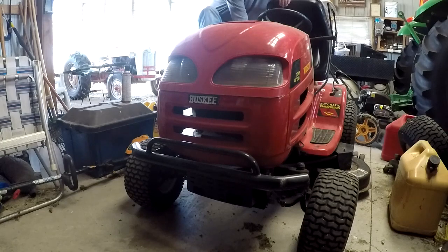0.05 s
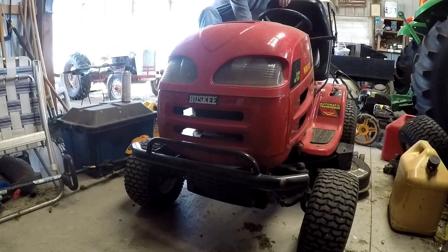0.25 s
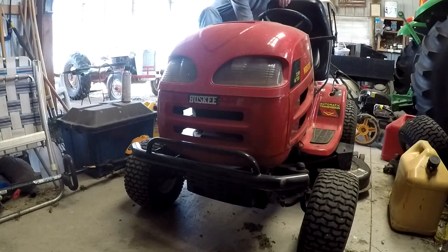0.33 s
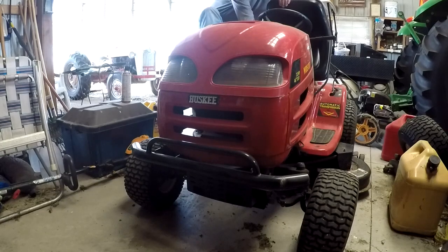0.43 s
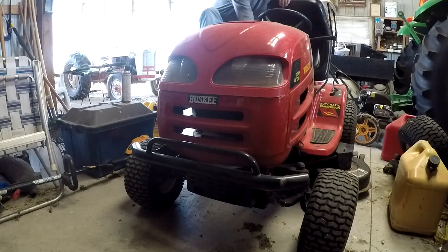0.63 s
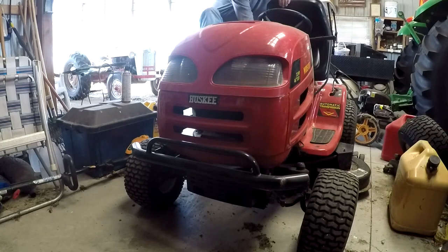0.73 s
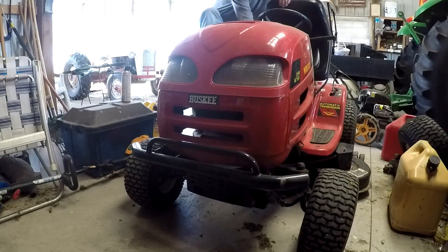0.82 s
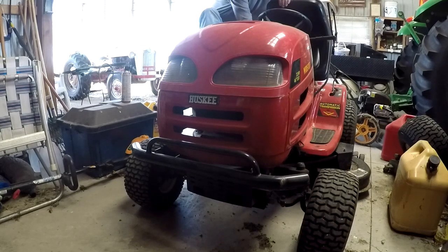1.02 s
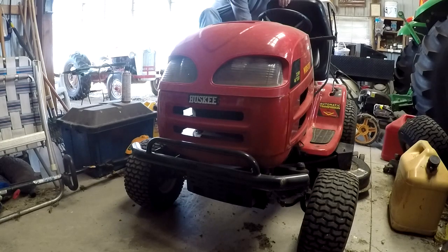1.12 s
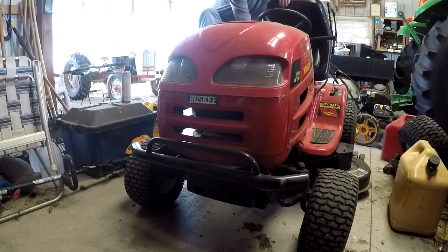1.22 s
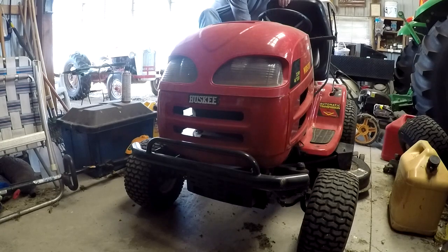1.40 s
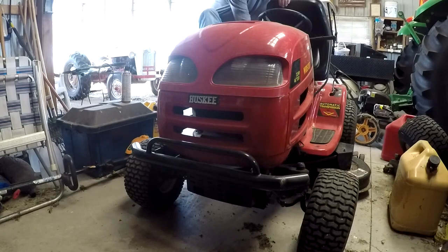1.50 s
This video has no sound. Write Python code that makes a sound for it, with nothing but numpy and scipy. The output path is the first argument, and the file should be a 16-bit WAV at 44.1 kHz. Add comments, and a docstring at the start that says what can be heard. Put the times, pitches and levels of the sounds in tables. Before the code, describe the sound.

A lawn tractor's starter snaps in with one sharp metallic clunk that rings briefly in a garage. The engine does not turn. A faint dull knock follows, while a draught rumbles on the microphone over soft hiss.

```python
"""A draught buffets the two microphone ports, over a low rumble and a faint hiss.
Half a second in, the starter solenoid of a lawn tractor standing in the open garage snaps in once:
the plunger hits its stop, the steel around it rings, and the garage answers briefly.
The engine does not turn. A faint dull knock follows, and the draught carries on."""
import sys
import numpy as np
from scipy import signal
from scipy.fft import rfft, irfft
from scipy.io import wavfile

SR = 44100
rng = np.random.default_rng(int(sys.argv[2]) if len(sys.argv) > 2 else 0)


def store_pcm(level_fs):
    """Save levels as 16-bit WAV."""
    pcm = np.round(np.clip(level_fs, -1, 1) * 32767).astype(np.int16)
    wavfile.write(sys.argv[1], SR, np.atleast_2d(pcm).T)


N = 68355
CLUNK_S = .4737


def amp(db):
    """Decibels to gain."""
    return 10 ** (np.asarray(db) / 20)


def read(points, hz):
    """Reads a curve on a log-frequency axis."""
    f, value = np.transpose(points)
    return np.interp(np.log(hz + 1), np.log(f + 1), value)


def level(points):
    """A gain for every sample from a curve in dB."""
    return amp(np.interp(np.arange(N) / SR, *np.transpose(points)))


def since(start):
    """Seconds since start, zero before it."""
    return np.maximum(np.arange(N) / SR - start, 0)


def burst(start, rise, t60):
    """Envelope that swells and dies away; times in seconds."""
    t = since(start)
    return (1 - np.exp(-t / rise)) * np.exp(-np.log(1000) * t / t60)


def noise(spectrum, channels=2):
    """Unrelated coloured noise for each channel, at an overall rms of 1."""
    colour = amp(read(spectrum, np.fft.rfftfreq(N, 1 / SR)))
    x = irfft(rfft(rng.standard_normal((channels, N))) * colour, N)
    return x / np.sqrt(np.mean(x ** 2) + 1e-20)


# The air around the microphone: shared by the ports, opposed between them, and its hiss.
# Each row: frequency in Hz, relative density in dB.
AIR_MID_SPECTRUM = [(20, 0), (50, 0), (130, -4), (200, -16.5), (280, -7.5), (400, -11), (620, -16),
                    (1070, -19), (2580, -25.5), (4500, -29.5), (7200, -27), (9500, -28.5), (12000, -34.5),
                    (14800, -46)]
AIR_SIDE_SPECTRUM = [(20, -7), (50, -1), (130, -17), (200, -21), (300, -8.5), (570, -11.5), (780, -11),
                     (1090, -14), (2500, -28.5), (4300, -38.5), (7340, -29.5), (9500, -33), (12000, -38.5),
                     (14800, -49)]
HISS_SPECTRUM = [(800, 10), (2200, 7), (4500, 1.5), (7200, 7), (10000, -12), (14000, -83)]
# The hiss comes and goes. Each row: time in seconds, level in dB.
HISS_CURVE = [(0, -73), (.1, -56), (.14, -51.5), (.195, -51.5), (.25, -63), (.38, -58.5), (.6, -57.5),
              (1.3, -74.5), (1.45, -64), (1.55, -55)]


def air():
    """The open garage at rest: a wide steady background and a soft wandering hiss."""
    mid = amp(-51.5) * noise(AIR_MID_SPECTRUM, channels=1)
    side = amp(-49) * noise(AIR_SIDE_SPECTRUM, channels=1)
    hiss = level(HISS_CURVE) * noise(HISS_SPECTRUM)
    return np.vstack([mid + side, mid - side]) + hiss


# The draught at each port. Each row: time in seconds, strength in dB.
LEFT_GUSTS = [(0, -33.5), (.3, -35), (.42, -27.5), (.48, -25.5), (.54, -32), (.595, -19), (.62, -39.5),
              (.73, -31.5), (.85, -40.5), (.99, -35), (1.12, -38), (1.22, -39.5), (1.29, -35.5),
              (1.34, -47.5), (1.55, -38.5)]
RIGHT_GUSTS = [(0, -42.5), (.1, -29), (.17, -38.5), (.22, -35.5), (.33, -25.5), (.39, -21), (.46, -20),
               (.53, -30), (.58, -22), (.64, -29), (.69, -31.5), (.74, -23.5), (.8, -26.5), (.89, -26),
               (.95, -33.5), (1.05, -33.5), (1.1, -42.5), (1.19, -42.5), (1.26, -29), (1.33, -44),
               (1.55, -40)]
# Wind noise right on the microphone. Each row: frequency in Hz, relative density in dB.
RUMBLE_SPECTRUM = [(15, -39), (28, -2), (50, 5), (95, -2), (140, -10.5), (200, -14), (300, -20), (450, -29),
                   (700, -45.5), (1500, -100)]
FLUTTER_SPECTRUM = [(30, -27), (90, -2.5), (150, 4.5), (200, -10.5), (270, -19), (400, -23.5), (700, -37),
                    (1500, -100)]
# Single eddies. Each row: centre in seconds, peak in dB, pitch in Hz, port struck (0 left, 1 right).
PORT_EDDIES = [(.199, -23.5, 102, 0), (0.211, -19.5, 108, 1), (0.254, -19, 78, 1), (0.298, -14, 105, 1),
               (0.344, -18, 120, 0), (0.3662, -11.5, 86, 1), (0.389, -10, 90, 1), (0.4216, -17.5, 94, 1),
               (.455, -23, 120, 1), (0.4696, -19.5, 67, 0), (0.552, -18.5, 55, 1), (0.5621, -13.5, 123, 1),
               (0.569, -10.5, 107, 1), (0.5789, -11, 84, 0), (0.5999, -21, 87, 0), (0.708, -11.5, 78, 1),
               (0.7264, -14.5, 69, 1), (0.753, -15, 86, 1), (0.832, -13.5, 64, 1), (0.885, -18, 100, 1),
               (1.028, -28, 45, 0), (1.049, -25.5, 110, 1), (1.24, -20.5, 60, 1), (1.2718, -17.5, 75, 0),
               (1.285, -18.5, 48.7, 1), (1.431, -26, 95, 1)]


def draught():
    """Turbulence rumbles at each port and brightens in the gusts; the larger eddies push, then pull."""
    reference_gust = amp(-24.5)
    strength = np.array([level(LEFT_GUSTS), level(RIGHT_GUSTS)]) / reference_gust
    rumble = amp(-3) * strength ** 0.74 * noise(RUMBLE_SPECTRUM)
    flutter = amp(-6) * strength ** 1.29 * noise(FLUTTER_SPECTRUM)  # grows faster than the rumble
    wind = reference_gust * (rumble + flutter)
    for centre, db, hz, port in PORT_EDDIES:
        passage = 2 * np.pi * hz * (np.arange(N) / SR - centre)
        wind[port] -= amp(db) * passage * np.exp((1 - passage ** 2) / 2)
    return wind


# The knock at the microphone. Each row: frequency in Hz, relative density in dB.
KNOCK_SPECTRUM = [(60, 7), (200, 3), (450, 3.5), (750, 1.5), (1400, -19), (2400, -11), (4000, -24),
                  (12000, -34)]


def knock():
    """A faint dull bump after the clunk, diffuse and equally loud at both ports."""
    return amp(-37.5) * burst(start=1.008, rise=.007, t60=0.13) * noise(KNOCK_SPECTRUM)


# How long the garage holds a sound. Each row: frequency in Hz, time to fall 60 dB in seconds.
GARAGE_T60 = [(300, 0.38), (800, 0.42), (2000, 0.34), (5000, 0.21), (7300, .29), (9000, 0.29), (13000, .17)]


def garage_decay(x, start):
    """Reverberation builds quickly from start, then each band dies away at its own rate."""
    hz, t, bands = signal.stft(x, SR, nperseg=256)
    decay = np.exp(-np.log(1000) * np.maximum(t - start, 0) / read(GARAGE_T60, hz)[:, None])
    _, tail = signal.istft(bands * decay, SR, nperseg=256)
    build_up = 1 - np.exp(-since(start) / 0.0067)
    return tail[:, :N] * build_up


# The garage's answer, from all around. Each row: frequency in Hz, relative density in dB.
TAIL_SPECTRUM = [(150, -6.5), (300, -1.5), (540, -12), (700, -24), (1000, -17), (1300, -19.5),
                 (1580, -18.5), (1850, -8), (2100, -19.5), (2600, -21), (5200, -26.5), (6500, -25),
                 (7230, -18), (8000, -29.5), (11000, -33.5), (12900, -33), (14800, -68)]


def garage_tail():
    """The room scatters the plunger's crack into a short diffuse tail."""
    return amp(-28) * garage_decay(noise(TAIL_SPECTRUM), CLUNK_S)


# Modes of the solenoid and the tractor's frame. Each row: frequency in Hz, relative level in dB,
# time to fall 60 dB, swell and delay, all three in seconds, left port minus right in dB.
STEEL_MODES = [(423, -44, .5, .006, 0, 0), (469, -47, .45, .015, .01, 0), (538, -36.5, .28, .008, .019, 0),
               (660, -33.5, .09, .001, 0, 0), (863, -45, .25, .002, 0, 0), (932, -34.5, .09, .001, 0, -1),
               (1112, -46, .2, .003, 0, 0), (1251, -48, .33, .004, 0, 0), (1400, -33.5, .07, .001, 0, -1),
               (1710, -33.5, .18, .001, 0, -1), (1740, -42, .2, .008, 0, 0), (1785, -37, .26, .002, 0, 0),
               (1836, -40, .45, .01, 0, 0), (1872, -50, .8, .01, .01, 0), (1895, -51, .8, .01, .01, 0),
               (1911, -32.5, .18, .003, .007, -1), (2270, -40, .09, .001, 0, 0),
               (7007, -47, .13, .001, 0, 0), (7120, -55, .33, .002, 0, 0),
               (7222, -28.5, .035, .0006, .0015, 4), (12980, -45, .04, .001, .002, 0)]
PORT_SPREAD_RAD = .45


def steel_ring():
    """Struck steel rings, directly and through the room; the blow reaches the hollow frame later."""
    direct = np.zeros((2, N))
    for hz, db, t60, swell, delay, pan_db in STEEL_MODES:
        # Each mode arrives at the two ports slightly out of phase.
        phase = np.pi * rng.standard_normal() + PORT_SPREAD_RAD * rng.standard_normal((2, 1))
        pan = amp(pan_db * np.array([[.5], [-.5]]))
        tone = np.sin(2 * np.pi * hz * since(CLUNK_S) + phase)
        direct += amp(db) * pan * burst(CLUNK_S + delay, swell, t60) * tone
    room = garage_decay(rng.standard_normal((2, N)), start=0)
    room /= np.linalg.norm(room[0])
    reverberant = signal.fftconvolve(direct, room, axes=1)[:, :N]
    return amp(-2) * direct + amp(-15) * reverberant


# The plunger's contacts, then the early returns from the garage's floor and walls.
# Each row: delay after the first contact in seconds, relative level in dB.
PLUNGER_CONTACTS = [(0, -6), (.0022, 0), (.0062, -1)]
EARLY_RETURNS = [(0.0115, -5), (0.026, -21)]
# The crack at the microphone. Each row: frequency in Hz, relative density in dB.
CRACK_SPECTRUM = [(200, 3), (400, 1), (900, -10), (1400, -8), (1850, -4), (2500, -14.5), (3500, -10),
                  (5200, -19.5), (6500, -10.5), (7230, -25), (8000, -18.5), (11000, -19.5), (12000, -16.5),
                  (13200, -13.5), (14800, -33)]
CRACK_SHARED = .55  # share of the power common to both ports


def plunger_crack():
    """The plunger chatters against its stop, and floor and walls return the crack."""
    power = sum(amp(db) ** 2 * burst(CLUNK_S + delay, rise=.0008, t60=0.021) ** 2
                for delay, db in PLUNGER_CONTACTS + EARLY_RETURNS)
    grit = noise(CRACK_SPECTRUM, channels=3)  # left, right, common
    at_ports = np.sqrt(CRACK_SHARED) * grit[2] + np.sqrt(1 - CRACK_SHARED) * grit[:2]
    return amp(-26) * np.sqrt(power) * at_ports


def scene():
    """The solenoid's clunk in the garage, with the knock, the draught and the background air."""
    clunk = plunger_crack() + steel_ring() + garage_tail()
    return clunk + knock() + draught() + air()


def record(dry):
    """The recorder cuts the treble steeply at its band limit."""
    lowpass = signal.firwin(511, cutoff=14800, window=("kaiser", 9), fs=SR)
    return signal.oaconvolve(dry, lowpass[None], "same")


dry = scene()
out = record(dry)
store_pcm(out)
```